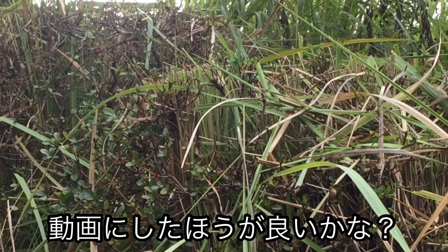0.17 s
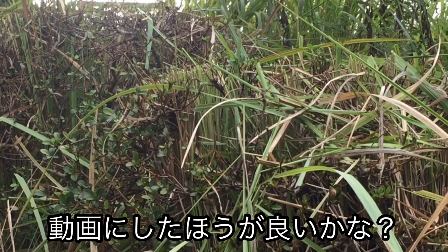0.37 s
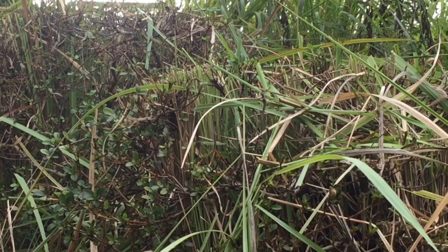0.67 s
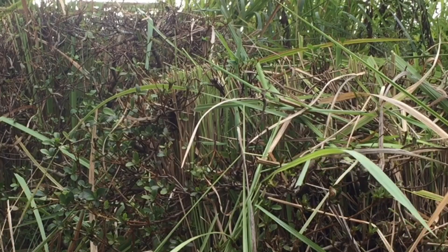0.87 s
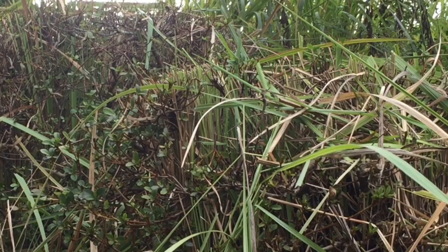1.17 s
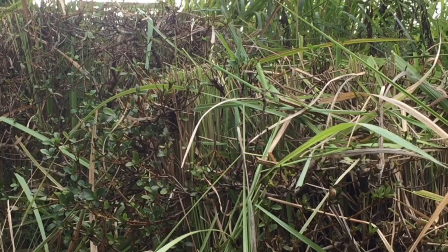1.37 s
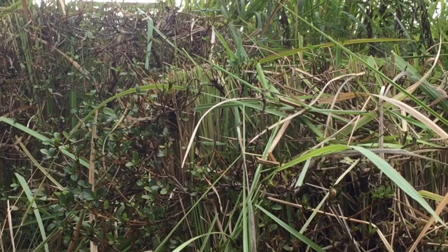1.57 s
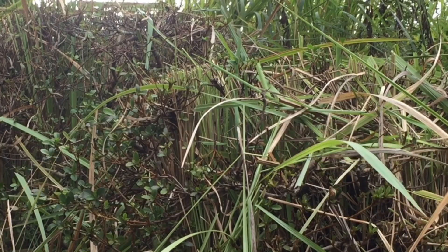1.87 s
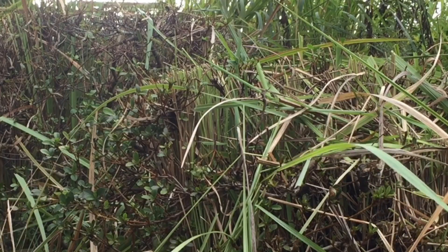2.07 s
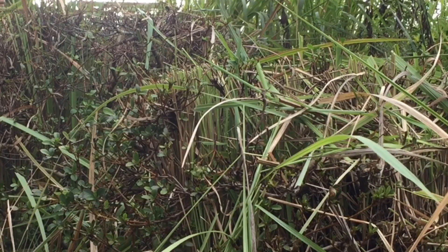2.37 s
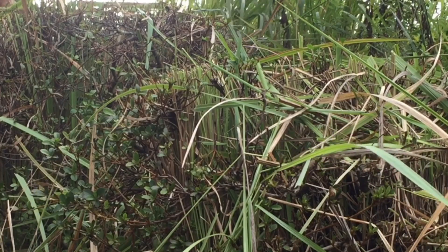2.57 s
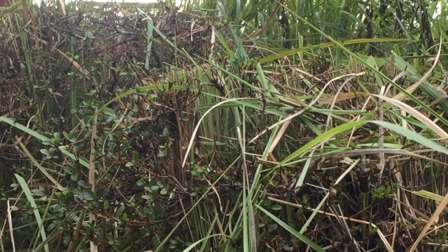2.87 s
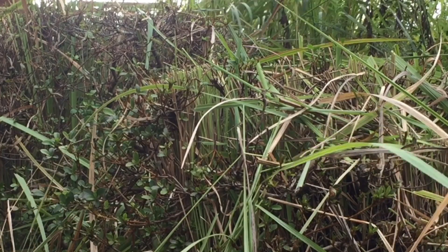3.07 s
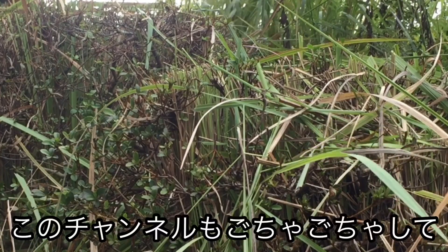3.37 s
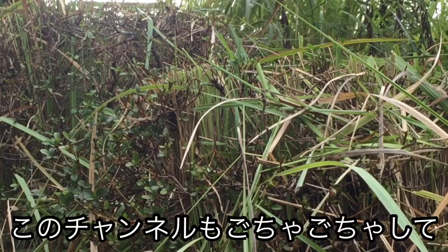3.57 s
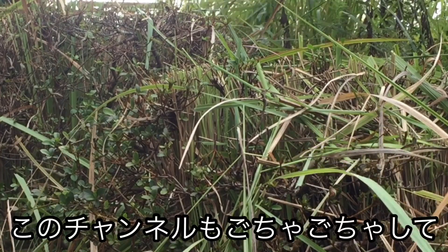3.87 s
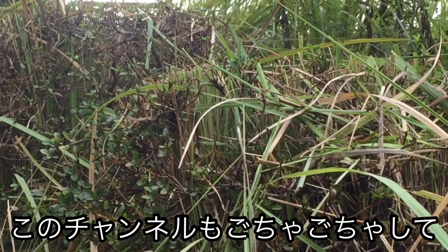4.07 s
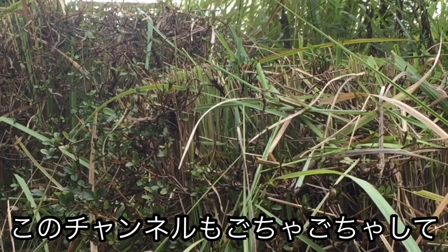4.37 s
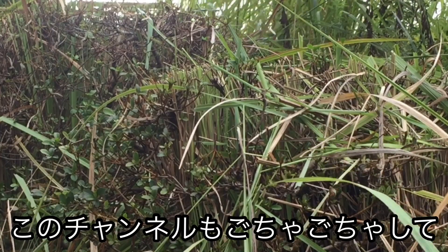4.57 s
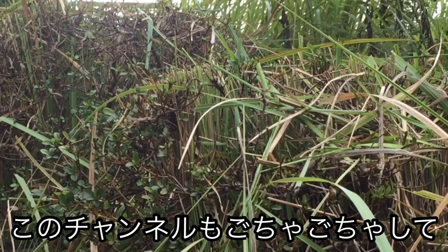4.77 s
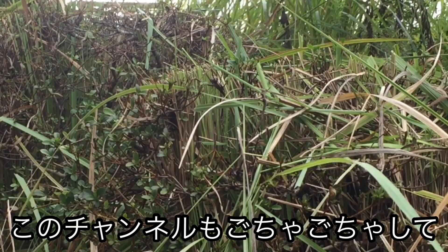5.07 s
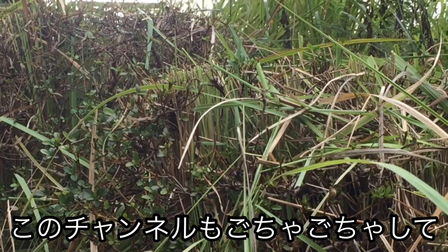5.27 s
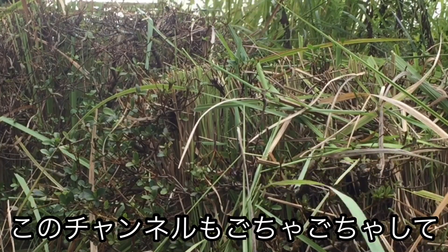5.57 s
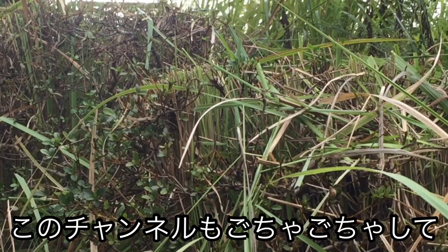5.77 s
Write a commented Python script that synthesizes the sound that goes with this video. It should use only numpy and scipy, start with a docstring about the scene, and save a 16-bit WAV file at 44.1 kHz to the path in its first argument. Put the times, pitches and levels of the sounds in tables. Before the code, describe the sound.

Dry leaves crinkle and handling thumps softly, then shears begin snipping at about 0.9 seconds. The first three cuts are thinner and softer; later ones are fuller, with scraping blades, crisp crushed stems and snaps. A pause comes before the last two cuts. Close, dry outdoor perspective with a very short diffuse tail among the plants, over quiet low air rumble and a weak motor drone.

```python
"""Hand shears cut dry grass in an overgrown yard, twelve strokes close to the microphone.
In each stroke the blades slide shut with a hiss, bite through crackling stems, snap and rub open again.
Hiss and crackle are filtered noise; some openings end in a small tick, a short scrape that rings the shears.
Around them lie stirred leaves and dull bumps of handling and trodden ground, all with a short diffuse tail.
Behind stands the yard: outdoor rumble and air in filtered noise, and a far motor in a wavering sine."""
import sys
import numpy as np
from scipy import signal
from scipy.fft import rfft, irfft
from scipy.io import wavfile
from scipy.ndimage import uniform_filter1d

SR = 44100
rng = np.random.default_rng(int(sys.argv[2]) if len(sys.argv) > 2 else 0)


def persist_wave(psi):
    """Save psi, clipped to +-1, as 16-bit WAV."""
    counts = np.round(np.clip(psi, -1, 1) * 32767).astype(np.int16)
    wavfile.write(sys.argv[1], SR, np.atleast_2d(counts).T)


N = 261072
TIME = np.arange(N) / SR
FREQS = np.maximum(np.fft.rfftfreq(N, 1 / SR), 1)

# Strokes of the shears. Each row: bite in seconds, closing time in seconds, grip time in seconds,
# slide in dB, bite in dB, blade ring in dB, bite half-length in seconds, stem snap in dB, stem centre in Hz,
# follow-through t60 in seconds, opening rub in dB, brightness in dB.
STROKES = [ (.881, 0.055, 0.027, -49, -53, -53, 0.0038, -40.5, 4260, 0.35, -78, -1),
           (1.287, 0.047, 0.0051, -46, -39, -50.5, 0.0049, -41.5, 8000, 0.23, -94, -1),
           (1.787, 0.053, 0.0092, -49.5, -37.5, -52, 0.0052, -36.5, 8200, 0.37, -86, -2),
           (2.168, 0.095, 0.066, -42, -42, -41, 0.0018, -33, 11200, 0.43, -79, -2),
           (2.611, 0.097, 0.052, -41, -34, -42, 0.0046, -39, 5240, 0.47, -73, -2.5),
           (3.022, 0.081, 0.04, -40.5, -45.5, -43.5, 0.0095, -34, 5860, 0.38, -55, -1),
           (3.44, 0.094, 0.063, -39, -35.5, -40.5, 0.0064, -32.5, 6000, 0.36, -58.5, -2.5),
           (3.846, 0.082, 0.063, -37.5, -32.5, -43, 0.0051, -37.5, 4600, 0.26, -57.5, -3),
           (4.258, 0.084, 0.078, -37, -31, -43, 0.0042, -38, 5500, 0.23, -62, -2.5),
           (4.668, 0.075, 0.027, -43.5, -38.5, -44, 0.0041, -31, 7300, 0.3, -60, -3.5),
           (5.273, 0.08, 0.017, -41, -35.5, -42, 0.0065, -35, 3220, 0.53, -65.5, -.5),
           (5.668, 0.074, 0.049, -40.5, -38.5, -41.5, 0.0086, -33, 3570, 0.23, -58, -2)]
# Spectrum of dry rubbing, for blades and stirred leaves. Each row: frequency in Hz, relative level in dB per Hz.
SLIDE_SPECTRUM = [(300, -19), (800, -21.5), (1600, -18), (2200, -9.5), (2850, -2.5), (4300, -3),
                  (6500, 0.5), (8500, -0.5), (9800, -3), (10600, 2), (13000, 2), (15800, -1.5)]


def undb(db):
    """Decibels to gain."""
    return 10 ** (np.asarray(db) / 20)


def unit(x):
    """Scale to rms 1."""
    return x / np.sqrt(np.mean(x ** 2))


def decay(t, t60):
    """Exponential fall by 60 dB in t60 seconds."""
    return np.exp(-np.log(1000) * t / t60)


def highpass(x, order, hz):
    """Take away the lows below hz."""
    return signal.sosfilt(signal.butter(order, hz, "high", fs=SR, output="sos"), x)


def shape(points):
    """A spectrum in dB on all frequencies, drawn straight over log frequency."""
    hz, db = np.transpose(points)
    return np.interp(np.log(FREQS), np.log(hz), db)


def level_line(points):
    """A level in dB over time, drawn straight between the given moments."""
    return np.interp(TIME, *np.transpose(points))


def colour(x, db):
    """Causal minimum-phase filter with the given dB shape; white noise keeps its power."""
    cepstrum = irfft(np.log(unit(undb(db))), N)
    # fold the cepstrum onto positive time
    cepstrum[1:N // 2] *= 2
    cepstrum[N // 2 + 1:] = 0
    return irfft(rfft(x) * np.exp(rfft(cepstrum)), N)


def walk(rate):
    """Random wander with a spread near 1, straight between rate knots a second."""
    knots = rng.standard_normal(4096)
    return np.interp(TIME * rate, np.arange(len(knots)), knots)


def crackle(rate, spread_db):
    """Dense tiny fractures of uneven size, rate a second on average, rms 1."""
    sizes = undb(spread_db * np.minimum(rng.exponential(size=N), 5))
    happens = rng.random(N) < rate / SR
    return unit(rng.standard_normal(N) * sizes * happens)


def swell(s, half):
    """A bell-shaped envelope around time s."""
    return np.exp(-.5 * np.minimum(((TIME - s) / half) ** 2, 10 * 10))


def add(out, s, sound):
    """Mix a sound in at time s."""
    place = int(s * SR) + np.arange(len(sound))
    inside = (place >= 0) & (place < N)
    out[place[inside]] += sound[inside]


def bursts(rows, below, above, ripple_db, ripple_hz, solid=0):
    """Brief contacts (s, dB, half-length s, centre Hz): a solid push within a rough scuff.
    Each body rings unevenly in a band that reaches some octaves below and above its centre."""
    out = np.zeros(N)
    chance = rng.standard_normal((len(rows), 2, 8192))
    count = chance.shape[-1]
    t = (np.arange(count) - count // 2) / SR
    f = np.maximum(np.fft.rfftfreq(count, 1 / SR), 1)
    reaches = np.broadcast_to(above, len(rows))
    for (scuff, resonances), (s, db, half, hz), reach in zip(chance, rows, reaches):
        bell = np.exp(-.5 * (t / half) ** 2)
        energy = np.sum(bell ** 2)
        force = scuff * bell + solid * np.sqrt(energy) * (t == 0)
        octaves = np.log2(f / hz)
        body = np.exp(-.5 * (octaves / np.where(f < hz, below, reach)) ** 2) / np.sqrt(f)
        body *= undb(ripple_db * np.interp(f / ripple_hz, np.arange(count), resonances))
        ring = irfft(rfft(force) * body)
        # the whole contact carries the energy of a bell at the given level
        add(out, s + t[0], ring * undb(db) * np.sqrt(energy / np.sum(ring ** 2)))
    return out


def scattered(until_s, db, half, hz, spread_db, spread_octaves, count):
    """Rows (s, dB, half-length s, centre Hz) of small contacts at uneven intervals."""
    rows = []
    for k, (late, size, pitch) in enumerate(rng.standard_normal((count, 3))):
        s = until_s * (k + .5 + .5 * late) / count
        rows.append((s, db + spread_db * size, half, hz * 2 ** (spread_octaves * pitch)))
    return rows


def shifting(x, depth_db, rate, count):
    """Fibre after fibre takes the load, so every narrow band swells and fades on its own."""
    spectrum = rfft(x)
    place = FREQS / FREQS[-1] * (count - 1)
    out = np.zeros(N)
    for k in range(count):
        band = irfft(spectrum * np.maximum(1 - np.abs(place - k), 0), N)
        out += band * undb(depth_db * walk(rate))
    return unit(out)


def cutting(rise_db=7, release_s=0.0065, slide_ring_db=-16):
    """Blades slide with growing pressure, crush the stems, follow through and rub open."""
    # Spectrum of crushed stems. Each row: frequency in Hz, relative level in dB per Hz.
    bite_spectrum = [(200, -25), (600, -18.5), (1100, 0), (1650, -62), (2200, 4), (3500, 3), (4600, 6),
                     (6500, 13), (8000, 10), (9700, 1.5), (12000, 7.5), (15800, 11)]
    # Resonances of the loaded blades. Each row: frequency in Hz, width in Hz, relative level in dB.
    blade_peaks = [(794, 160, -8), (1050, 150, -8.5), (1304, 90, -2.5), (2116, 220, -3.5), (2260, 180, 2.5),
                   (2580, 140, 1.5), (2800, 130, -1), (3360, 440, 2), (3380, 59, 6.5), (3820, 46, 7),
                   (4300, 250, -3), (6090, 125, 1)]
    follow_db = -3.5  # follow-through against the slide
    open_after_s, open_half_s = .165, 0.037  # the blades rub open this long after the bite
    slide, rub, bite, load = np.zeros((4, N))
    for s, closing, grip_s, slide_db, bite_db, ring_db, half, _, _, t60, open_db, _ in STROKES:
        travel = np.clip((TIME - s) / closing + 1, 0, 1)
        grip = np.clip((TIME - s + closing) / grip_s, 0, 1)
        since = np.clip(TIME - s, 0, 1)
        held = np.exp(-since / release_s)
        slide += grip * undb(slide_db + rise_db * (travel - 1)) * held
        slide += undb(slide_db + follow_db) * decay(since, t60) * (1 - held)
        rub += undb(open_db) * swell(s + open_after_s, open_half_s)
        crush = swell(s, half)
        bite += undb(bite_db) * crush
        load += undb(ring_db) * crush
    grain = shifting(crackle(rate=12000, spread_db=0.5), depth_db=4.0, rate=80, count=44)
    friction = (slide + rub) * grain * undb(0.5 * walk(100))
    fibres = bite * crackle(rate=12000, spread_db=-11.0)
    # the blades ring most when the stems load them
    shaking = (load + undb(slide_ring_db) * (slide + rub)) * crackle(rate=9000, spread_db=3.5)
    power = sum((undb(db) / (1 + ((FREQS - hz) / width) ** 2)) ** 2 for hz, width, db in blade_peaks)
    ring = colour(shaking, 10 * np.log10(power))
    sound = colour(friction, shape(SLIDE_SPECTRUM)) + colour(fibres, shape(bite_spectrum)) + ring
    # brightness tilts lows against treble, drifting from tuft to tuft
    low = signal.sosfilt(signal.butter(1, 6000, fs=SR, output="sos"), sound)
    bright_db = np.interp(TIME, [row[0] for row in STROKES], [row[-1] for row in STROKES])
    return low * undb(-bright_db) + (sound - low) * undb(bright_db)


def stems(count=2):
    """The thickest stem of each tuft snaps at the bite; thinner ones give way just before and after."""
    snap_half_s, scatter_octaves = 0.0011, 0.19
    thin_db = -11.5  # the thinner stems of a tuft against the thickest
    rows = []
    for stroke, thin in zip(STROKES, rng.standard_normal((len(STROKES), count, 2))):
        s, (half, db, hz) = stroke[0], stroke[6:9]
        rows.append((s, db, snap_half_s, hz))
        for late, pitch in thin:
            rows.append((s + half * late, db + thin_db, snap_half_s, hz * 2 ** (scatter_octaves * pitch)))
    return bursts(rows, below=0.3, above=1.0, ripple_db=2, ripple_hz=450)


def open_stop(contact_s=0.00093, detune=0.011, scrape_db=-14, lowest_hz=2250):
    """A short chatter of the stop rings the shears, which are too small to radiate lows."""
    # The handles reach their open stop. Each row: time in seconds, level in dB.
    tick_rows = [(1.081, -52.5), (2.821, -51), (3.251, -50.5), (3.667, -45.5), (4.085, -48.5), (4.5, -53.5),
                 (5.865, -53)]
    # Ring of the shears at the stop. Each row: frequency in Hz, relative level in dB, t60 in seconds.
    stop_modes = [(2550, 1.5, 0.022), (2730, 3, 0.022), (2820, -1, .028), (3620, 4, 0.013),
                  (3850, 0.5, 0.018), (4130, 3, 0.017), (4780, -7, .02), (7540, -4.5, 0.017)]
    out = np.zeros(N)
    t = np.arange(SR // 20) / SR
    for s, db in tick_rows:
        ring = np.zeros(len(t))
        for hz, gain_db, t60 in stop_modes:
            mode_hz = hz * (1 + detune * rng.standard_normal())
            ring += undb(gain_db) * np.sin(2 * np.pi * mode_hz * t) * decay(t, t60)
        contact = rng.standard_normal(len(t)) * t * np.exp(-t / contact_s)
        ringing = unit(signal.fftconvolve(contact, ring)[:len(t)])
        tick = ringing + undb(scrape_db) * unit(contact)
        # levelled by its loudest 2 ms
        add(out, s, undb(db) * tick / np.sqrt(uniform_filter1d(tick ** 2, size=90).max()))
    return highpass(out, 6, lowest_hz)


def leaves():
    """Dry leaves and stalks crack singly over a faint rustle of stirred leaves in filtered noise."""
    # Cracks between the bites. Each row: time in seconds, level in dB, half-length in seconds, centre in Hz.
    crinkles = [(.034, -51.5, 0.0026, 5050), (.051, -55, 0.009, 5700), (.126, -55.5, 0.0037, 5800),
                (.283, -61.5, .015, 6500), (.441, -61, 0.0066, 6360), (.640, -58.5, 0.0019, 4700),
                (.922, -60, 0.0027, 5000), (1.018, -64.5, 0.013, 9000), (1.232, -57.5, 0.0011, 5000),
                (1.250, -47.5, 0.0016, 5860), (1.730, -55, 0.0048, 4600), (1.742, -61.5, .007, 1700),
                (1.817, -42, 0.0015, 1870), (2.033, -55.5, 0.0034, 4500), (2.064, -60, 0.0046, 13000),
                (2.266, -50, .0018, 13400)]
    # Rustle of stirred leaves. Each row: time in seconds, level in dB.
    stir_levels = [(0, -72.5), (.7, -81.5), (1.2, -72.5), (2.5, -74.5), (3.3, -65.5), (4.1, -66),
                   (4.9, -68.5), (5.9, -64)]
    stir = undb(level_line(stir_levels) + 4.4 * walk(24.06)) * rng.standard_normal(N)
    # faint crinkles while the tuft is gathered
    faint = scattered(until_s=2.1, db=-71.5, half=0.0016, hz=5000, spread_db=7, spread_octaves=0.1, count=14)
    cracks = bursts([*crinkles, *faint], below=0.85, above=0.94, ripple_db=5.0, ripple_hz=618)
    return cracks + colour(stir, shape(SLIDE_SPECTRUM))


def knocks(boom_hz=105, boom_q=1.2, boom_db=-1, grit_db=-21, hard_hz=220):
    """Dull bumps set off a low boom; dry litter crackles faintly under the harder ones."""
    # Handling and trodden ground. Each row: time in seconds, level in dB, half-length in seconds, centre in Hz.
    bump_rows = [(.122, -53, 0.0048, 146), (.215, -45, 0.0072, 214), (.233, -54.5, 0.014, 208),
                 (.457, -53.5, .004, 153), (.768, -42, 0.002, 220), (.838, -49.5, 0.008, 149),
                 (.895, -56, 0.021, 208), (1.011, -55.5, .009, 196), (1.398, -52, 0.0075, 198),
                 (1.47, -55, 0.02, 194), (1.545, -44.5, 0.0025, 298), (1.557, -42, 0.0058, 240),
                 (1.578, -37.5, 0.0027, 220), (1.589, -38.5, .002, 193), (1.677, -46, 0.013, 235),
                 (1.759, -41, 0.0056, 251), (1.884, -47, 0.0022, 238), (1.963, -56.5, 0.0019, 450),
                 (1.970, -36.5, 0.00137, 212), (2.198, -44, 0.0037, 190), (3.0, -56, 0.0085, 155),
                 (3.357, -40, 0.0015, 166), (3.477, -53.5, 0.0058, 158), (3.785, -59, 0.019, 158),
                 (4.08, -53.5, 0.004, 152), (4.321, -53, 0.0021, 110), (4.965, -58, 0.018, 120),
                 (5.045, -58.5, 0.019, 127), (5.255, -53, 0.0091, 130), (5.853, -54.5, 0.0038, 128)]
    # small bumps of handling all the way through
    jostle = scattered(N / SR, db=-63, half=0.0033, hz=155, spread_db=2.5, spread_octaves=0.32, count=36)
    rows = [*bump_rows, *jostle]
    # bumps centred at 235 Hz or more reach an octave above their centre, lower ones less far
    reach = np.minimum(np.array(rows)[:, 3] / 235, 1)
    bumps = bursts(rows, below=0.92, above=reach, ripple_db=-0.5, ripple_hz=110, solid=0.48)
    boom = signal.lfilter(*signal.iirpeak(boom_hz, boom_q, fs=SR), bumps)
    hard = highpass(bumps, 2, hard_hz)
    weight = np.sqrt(np.abs(uniform_filter1d(hard ** 2, size=256)))
    litter = shape([(300, -5), (1100, 9), (2000, -4.0), (5000, -13)])  # Hz, relative dB
    grit = colour(weight * crackle(rate=2500, spread_db=2.5), litter)
    return bumps + undb(boom_db) * boom + undb(grit_db) * grit


def thicket(x, t60=0.17, wet_db=-15):
    """The surrounding stems scatter a short diffuse tail."""
    t = np.arange(SR // 4) / SR
    tail = rng.standard_normal(len(t)) * decay(t, t60)
    tail /= np.sqrt(np.sum(tail ** 2))
    return x + undb(wet_db) * signal.fftconvolve(x, tail)[:N]


def far_motor(motor_hz=126.3, waver_db=4):
    """The drone of a far motor: one sine that wavers in pitch and level."""
    # Each row: time in seconds, level in dB.
    motor_levels = [(0, -80), (.8, -79), (1.4, -63), (2.2, -64.5), (2.8, -68.5), (5.9, -83.5)]
    pitch = motor_hz * (1 + 0.024 * walk(16))
    drone = np.sqrt(2) * np.sin(2 * np.pi * np.cumsum(pitch) / SR)
    return drone * undb(level_line(motor_levels) + waver_db * walk(14))


def yard(level_db=-66.65, waver_db=1.53):
    """Outdoor rumble and air: noise, strongest in the lows, with an unsteady level."""
    # Each row: frequency in Hz, relative level in dB per Hz.
    yard_spectrum = [(15, -103), (25, -30), (133, -1), (254, -8.5), (324, -11.5), (391, -13), (541, -16),
                     (619, -15.5), (879, -20.5), (953, -21.5), (1430, -23.5), (3480, -25.5), (4810, -25.5),
                     (5210, -27.5), (15700, -41.5)]
    air = rng.standard_normal(N) * undb(level_db + waver_db * walk(17))
    return colour(air, shape(yard_spectrum))


def scene():
    """All the close sounds in the thicket, over the yard and the far motor."""
    close = cutting() + stems() + open_stop() + leaves() + knocks()
    return (thicket(close) + far_motor() + yard())[None]


def record(dry, low_hz=56, top_hz=15780):
    """The microphone sheds the deep bass and the recorder cuts the top."""
    thin = highpass(dry, 3, low_hz)
    return signal.sosfilt(signal.ellip(12, .1, 80, top_hz, fs=SR, output="sos"), thin)


dry = scene()
out = record(dry)
persist_wave(out)
```